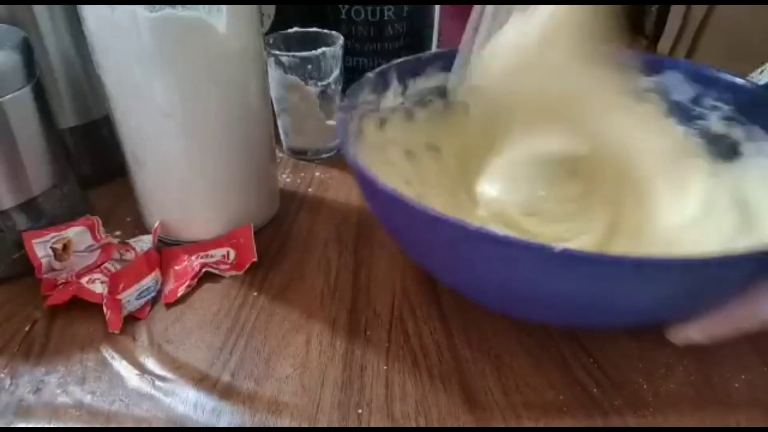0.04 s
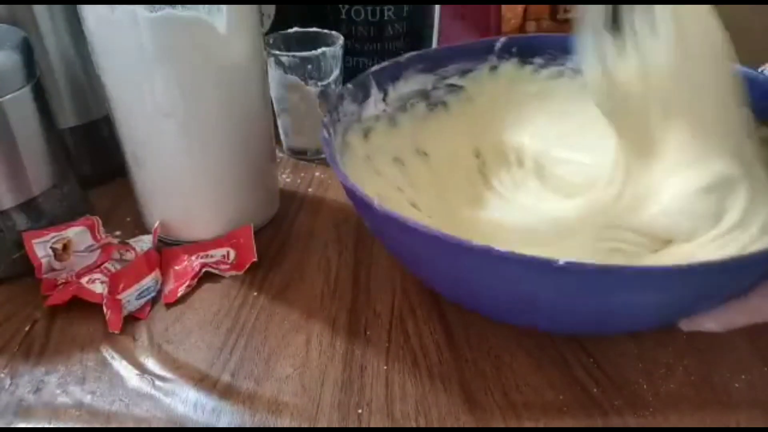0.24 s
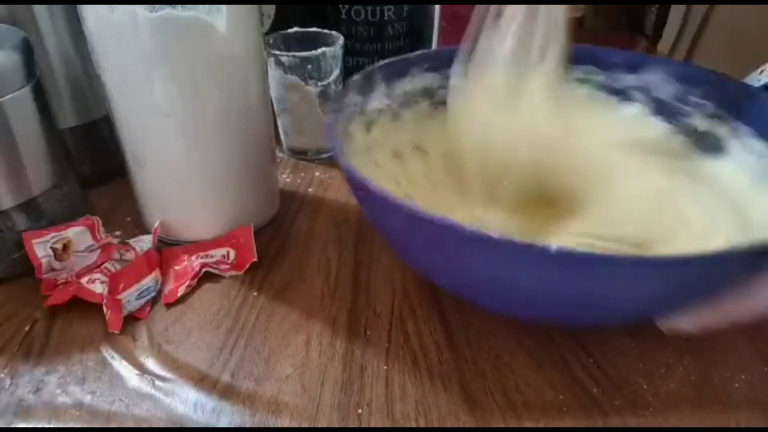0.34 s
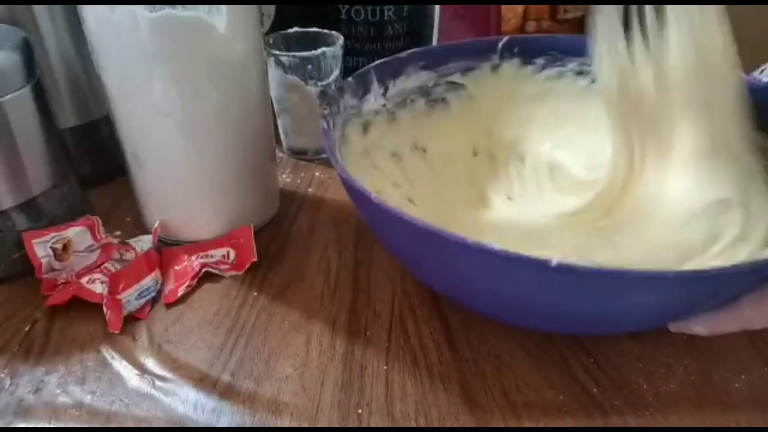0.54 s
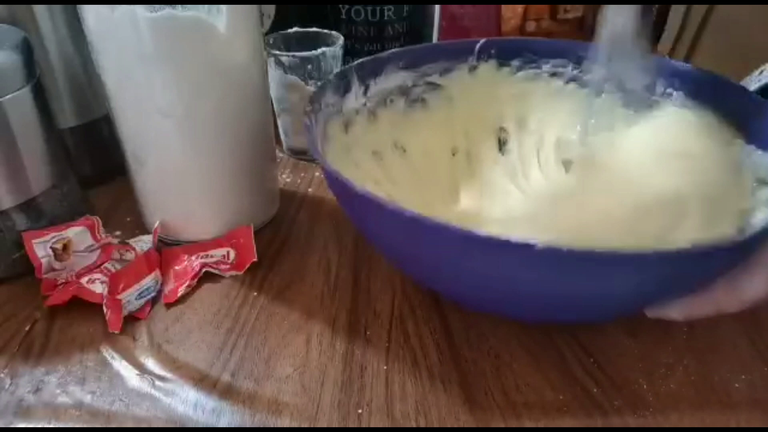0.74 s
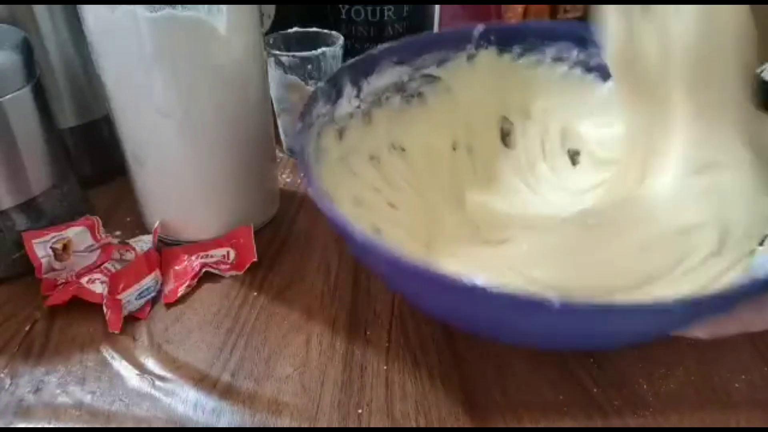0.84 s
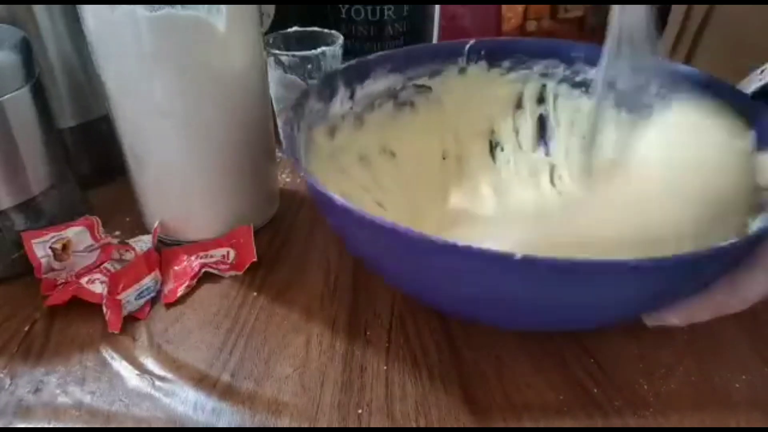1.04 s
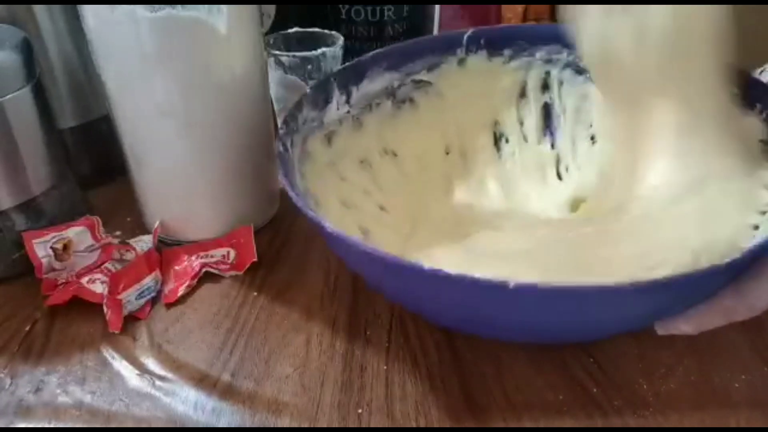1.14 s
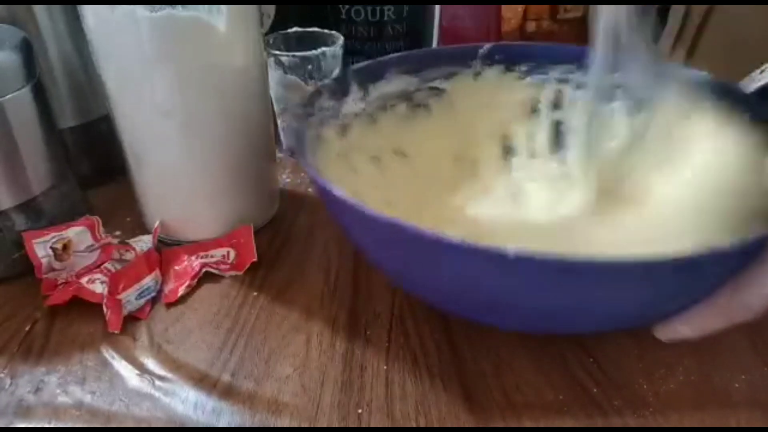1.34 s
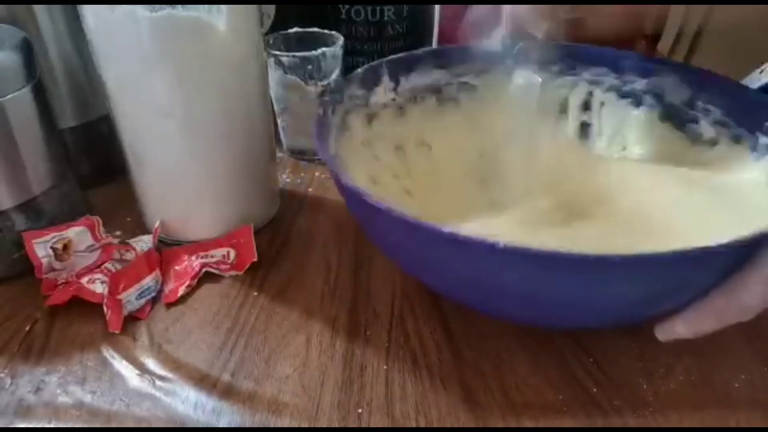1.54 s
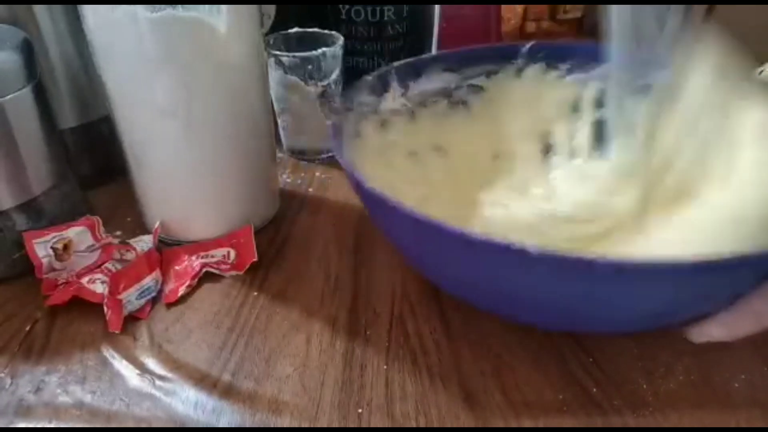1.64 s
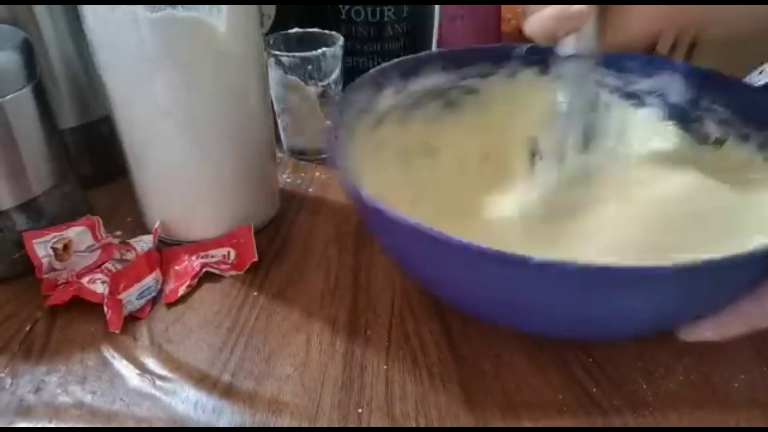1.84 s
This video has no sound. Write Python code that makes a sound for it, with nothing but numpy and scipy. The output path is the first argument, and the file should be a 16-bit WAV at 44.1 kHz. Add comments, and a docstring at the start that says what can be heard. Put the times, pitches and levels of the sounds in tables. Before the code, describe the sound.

A wire whisk beats thick batter in a plastic bowl, about three and a half strokes a second; each stroke gives dull knocks, sharp clacks and a wet squelch, heard close in stereo in a hard-walled kitchen.

```python
"""A hard-walled kitchen: a wire whisk beats thick batter in a hand-held plastic bowl, close to a stereo pair.
About three and a half strokes a second: dull knocks, a quick cluster of clacks, a squelch of batter.
Each contact is a snap plus damped noise, with the bowl's low modes thudding; batter is swarms of tiny pops.
The room is decaying noise convolved with the close sound, over a quiet floor of rumble and hiss."""
import sys
import numpy as np
from scipy import signal
from scipy.fft import rfft, irfft
from scipy.io import wavfile
from scipy.ndimage import uniform_filter1d

SR = 44100
rng = np.random.default_rng(int(sys.argv[2]) if len(sys.argv) > 2 else 0)


def persist_wave(psi):
    """Save psi, clipped to +-1, as 16-bit WAV."""
    counts = np.round(np.clip(psi, -1, 1) * 32767).astype(np.int16)
    wavfile.write(sys.argv[1], SR, np.atleast_2d(counts).T)


N = 83790
LEAD = SR // 5  # samples of run-up, so that the room already rings at the start
SIZE = N + LEAD
T = np.arange(SR // 5) / SR  # time within one short sound, s


def amp(db):
    """Decibels to gain."""
    return 10 ** (np.asarray(db) / 20)


def along(points, hz):
    """(Hz, value) points interpolated on a log frequency axis."""
    f, v = np.transpose(points)
    return np.interp(np.log(hz + 1), np.log(f + 1), v)


def freqs(x):
    """The frequencies of a signal's spectrum, in Hz."""
    return np.fft.rfftfreq(x.shape[-1], 1 / SR)


def tilt(hz, db_per_octave):
    """Brightness: a slope in dB that reaches its full steepness well above 500 Hz."""
    return db_per_octave * np.log2(1 + hz / 500)


def burst(x):
    """Fade out a short sound and scale it to the energy of 10 ms at rms 1."""
    x = x * np.clip(2 - T / T[-1] / .45, 0, 1)
    energy = np.mean(np.sum(x ** 2, axis=-1))
    return x / np.sqrt(energy / (SR / 100) + 1e-20)


def add(track, s, sound):
    """Mix a sound in at time s."""
    i = max(0, round(s * SR) + LEAD)
    track[:, i:i + sound.shape[-1]] += sound[..., :SIZE - i]


def coloured(x, shape_db):
    """Causal minimum-phase filter with a given level at each frequency."""
    n = x.shape[-1]
    cepstrum = irfft(np.log(amp(shape_db)), n)
    # folding the cepstrum forward in time makes the filter causal
    cepstrum[1:n // 2] *= 2
    cepstrum[n // 2 + 1:] = 0
    return irfft(rfft(x) * np.exp(rfft(cepstrum)), n)


def spread(pair, alike):
    """Two unrelated signals become left and right with a given likeness (correlation)."""
    turn = np.arccos(np.clip(along(alike, freqs(pair)), -1, 1)) / 2
    mid, side = irfft(rfft(pair) * [np.cos(turn), np.sin(turn)], pair.shape[-1])
    return np.array([mid + side, mid - side])


# how alike the close sound is at the two microphones: (f/Hz, left-right likeness 0..1)
CLOSE_ALIKE = [(100, 0.77), (300, 0.87), (700, 0.62), (1700, 0.2), (4000, 0.31), (12000, 0.018)]
SNAP_DB, SNAP_DELAY_S, SNAP_HZ = -4.5, 0.000499, 4640  # level beside the ring, delay, low-pass corner
BITE_HZ, BITE_OCTAVES = 2800, 0.47  # centre and width of the upper-mid bite


def contact(t60, colour, tilt_db, bite_db=0):
    """One sharp snap, then the dense, quickly damped ringing of the plastic."""
    hz = freqs(T)
    noise = rfft(rng.standard_normal((2, len(T))) * amp(-60 * T / t60))
    # even out the noise spectrum, so that the colour table alone sets the tone
    power = uniform_filter1d(np.abs(noise) ** 2, size=160, axis=1)
    ring = noise / np.sqrt(np.abs(power) + 1e-12)
    delay = np.exp(-2j * np.pi * hz * SNAP_DELAY_S)
    snap = amp(SNAP_DB) * delay / (1 + 1j * hz / SNAP_HZ)
    hit = spread(irfft(ring, len(T)), CLOSE_ALIKE) + irfft(snap, len(T))
    bite = np.exp(-(np.log2((hz + 1) / BITE_HZ) / BITE_OCTAVES) ** 2 / 2)
    shape_db = along(colour, hz) + tilt(hz, tilt_db) + bite_db * bite
    return burst(coloured(hit, shape_db))


# modes of the loaded bowl before scatter and detuning: (f/Hz, relative level/dB, t60/s)
BOWL_MODES = [(96.2, -11.5, 0.11), (131.3, -4.5, 0.12), (162, -8.5, 0.075), (202.8, -3, 0.11),
              (230.6, -2, 0.055), (273.4, 2, 0.049), (316, 1, 0.042), (360, 0.5, 0.028), (615, -6.5, 0.075),
              (624, -15, 0.11), (766, -13, 0.024), (863, -5, 0.023), (1013, -18.5, 0.027)]
LOAD_DETUNE, MODE_SCATTER_DB = .03, 2  # standard deviations: fraction of frequency, level
BOWL_ATTACK_S, FOCUS_OCTAVES = 0.0014, 0.77


def bowl(centre_hz):
    """The damped low modes of the bowl, detuned by shifting batter; where the whisk lands decides which lead."""
    hz, db, t60 = np.transpose(BOWL_MODES)[:, :, None]
    size, detune = rng.standard_normal((2, len(BOWL_MODES), 1))
    sign = (-1) ** np.arange(len(BOWL_MODES))[:, None]
    envelope = sign * amp(db + MODE_SCATTER_DB * size - 60 * T / t60)
    modes = envelope * np.sin(2 * np.pi * hz * (1 + LOAD_DETUNE * detune) * T)
    focus = np.exp(-(np.log2(hz / centre_hz) / FOCUS_OCTAVES) ** 2 / 2)
    attack = 1 - np.exp(-T / BOWL_ATTACK_S)
    return burst((focus * modes).sum(0) * attack)


# wires hit the bowl wall:
# (t/s, clack level/dB, brightness/dB per octave, upper-mid bite/dB, thud level/dB, thud centre f/Hz)
WALL_CLACKS = [(-.07, -12.5, -1.2, 1.5, -44, 500), (.2080, -30.5, 2.5, -7, -41, 303),
               (.2170, -30, -4, -8, -26, 510), (0.2233, -28, 4.5, -1.5, -38, 202),
               (0.2287, -25.5, -1.5, -11, -25, 143), (.2590, -40.5, 8.5, -6, -39, 160),
               (0.4967, -24.5, 3, -9, -60, 251), (.5000, -20.5, -2, 0, -24, 244),
               (.5030, -30, 3, -33, -26, 259), (0.5056, -26, -0.5, -7.5, -23, 200),
               (0.5808, -43, 7.5, -22, -48, 202), (0.7918, -28, -1, -3, -33.5, 277),
               (.7940, -23, -3, -4, -19, 266), (0.8011, -25.5, 0.5, -2.5, -25, 235),
               (0.8157, -33, -7.5, 4, -32, 266), (1.0793, -20.5, -4, -4, -34, 650),
               (1.085, -33, 1, -15, -29, 644), (1.0922, -29.5, 4, 14, -22.5, 290),
               (1.0986, -26.5, 0, 0.5, -32.5, 295), (1.3745, -25.5, -3, -0.5, -31.5, 497),
               (1.3791, -17, 0.5, -4, -23, 326), (1.3825, -23, 5.5, 5, -25, 285),
               (1.6662, -36.5, 4.5, -5, -67, 397), (1.6726, -28, 5, 0.5, -33.5, 400),
               (1.674, -21.5, 0.4, 4.5, -36.5, 330), (1.6827, -31.5, 4.5, -29, -53.5, 400)]
# the whisk knocks the bowl through a cushion of batter:
# (t/s, knock level/dB, brightness/dB per octave, thud level/dB, thud centre f/Hz)
CUSHIONED_KNOCKS = [(0.1152, -43, -2, -35, 190), (0.159, -46, -1, -37.5, 220),
                    (0.25, -30, -5.5, -38.5, 180), (0.327, -49, -3, -36.5, 134),
                    (0.4519, -31, -3, -28, 166), (0.467, -37, -1.5, -33, 200),
                    (0.484, -29.5, -3, -38.5, 245), (0.7311, -30.5, -4, -32.5, 950),
                    (0.7442, -34, -3, -38, 216), (0.7664, -37.5, -3, -37, 398),
                    (.8205, -30.5, 2.5, -29, 270), (1.0645, -26.5, 2, -25, 252),
                    (1.0810, -26.5, 4, -31, 640), (1.1404, -34.5, 1.5, -36.5, 248),
                    (1.3382, -34, 2, -30, 150), (1.3467, -28.5, 2, -29, 200), (1.6106, -34, -1, -36, 280),
                    (1.6422, -39, -8, -42, 260), (1.724, -64, 14, -51, 300), (1.881, -38, -4.5, -33, 198),
                    (1.8900, -40, 3, -27, 163)]
# spectrum of a clack before brightness and bite: (f/Hz, relative level/dB)
CLACK_SPECTRUM = [(40, -29), (120, -18.5), (260, 2.5), (500, 3.5), (900, 1.5), (1400, 4.5), (2300, 2.5),
                  (4000, -1.5), (6300, -9), (8000, -18), (9500, -21), (10500, -33), (12300, -30),
                  (13300, -21), (15300, -28.5), (16500, -50)]
# spectrum of a knock before brightness: (f/Hz, relative level/dB)
KNOCK_SPECTRUM = [(30, -25), (100, 5.5), (300, -1), (500, -6), (850, 1), (1400, -12.5), (2500, -18),
                  (5000, -35), (9000, -47), (14000, -64)]
CLACK_T60_S, KNOCK_T60_S = 0.023, 0.038


def whisk():
    """Hard clacks and cushioned knocks; both set the bowl thudding."""
    out = np.zeros((2, SIZE))
    for s, db, tilt_db, bite_db, thud_db, thud_hz in WALL_CLACKS:
        clack = amp(db) * contact(CLACK_T60_S, CLACK_SPECTRUM, tilt_db, bite_db)
        add(out, s, clack + amp(thud_db) * bowl(thud_hz))
    for s, db, tilt_db, thud_db, thud_hz in CUSHIONED_KNOCKS:
        knock = amp(db) * contact(KNOCK_T60_S, KNOCK_SPECTRUM, tilt_db)
        add(out, s, knock + amp(thud_db) * bowl(thud_hz))
    return out


POPS_PER_S, POP_SPREAD_DB = 2500, 4  # mean rate per channel, standard deviation of pop level


def swarm(swell, colour, tilt_db=0):
    """Many tiny pops of uneven size, at random instants under one swell."""
    shape = (2, len(T))
    sizes = np.sign(rng.standard_normal(shape)) * amp(POP_SPREAD_DB * rng.standard_normal(shape))
    pops = (rng.random(shape) < POPS_PER_S / SR) * sizes * swell
    hz = freqs(T)
    shape_db = along(colour, hz) + tilt(hz, tilt_db)
    return burst(spread(coloured(pops, shape_db), CLOSE_ALIKE))


# batter tears from the wires: (t/s at its height, level/dB, rise/s, brightness/dB per octave)
BATTER_SQUELCHES = [(.015, -54, 0.053, -4), (.06, -52, 0.036, -3), (0.229, -27, 0.018, 0.5),
                    (.385, -61, 0.029, 17), (0.507, -29, 0.018, 0.5), (0.795, -27, 0.018, 1.5),
                    (1.101, -30.5, .02, 1.5), (1.388, -28.5, .014, -1), (1.675, -37, 0.011, 0.5)]
# spectrum of a squelch before brightness: (f/Hz, relative level/dB)
SQUELCH_SPECTRUM = [(50, -42), (200, -10), (600, -12), (2000, 10.5), (5000, -1), (8000, -5.5),
                    (9500, -13.5), (11000, -18), (12300, -14), (13500, -11), (15300, -15), (16500, -33)]
# the whisk drags through the thick mass: (start t/s, length/s, level/dB)
WHISK_DRAGS = [(0.059, 0.11, -38.5), (0.281, 0.055, -44), (0.458, 0.067, -35.5), (.732, 0.1, -42.5),
               (1.115, 0.11, -43.5), (1.343, 0.056, -35.5), (1.613, .06, -43.5)]
# spectrum of a drag: (f/Hz, relative level/dB)
DRAG_SPECTRUM = [(40, -17), (110, 0.5), (280, -5.5), (450, -11), (800, -1.5), (1400, -10), (3000, -17.5),
                 (6000, -32), (14000, -42)]
SQUELCH_FALL_S = 0.014  # time constant


def batter():
    """A low churning while the wires drag, and a wet crackle of air pockets as they tear free."""
    out = np.zeros((2, SIZE))
    for s, db, rise, tilt_db in BATTER_SQUELCHES:
        fall = np.exp(-np.maximum(T - rise, 0) / SQUELCH_FALL_S)
        swell = np.minimum(T / rise, 1) ** 2 * fall
        add(out, s - rise, amp(db) * swarm(swell, SQUELCH_SPECTRUM, tilt_db))
    for s, length, db in WHISK_DRAGS:
        arch = np.sqrt(np.clip(T / length * (1 - T / length), 0, 1))
        add(out, s, amp(db) * swarm(arch, DRAG_SPECTRUM))
    return out


# how alike the room is at the two microphones: (f/Hz, left-right likeness 0..1)
ROOM_LIKENESS = [(100, 1), (280, .93), (600, 0.81), (1100, 0), (4000, 0)]
# how long the kitchen rings: (f/Hz, t60/s)
ROOM_RING = [(100, 0.74), (260, 0.39), (700, 0.45), (1840, 0.55), (4850, 0.44), (9000, 0.39), (14000, 0.32)]
# how loud the kitchen rings: (f/Hz, level/dB against the direct sound)
ROOM_LEVEL = [(50, -9), (130, -2), (260, -15.5), (600, -4.5), (1500, -10.5), (4000, -8), (8000, -6),
              (14000, -7.5)]
ROOM_BUILD_S = 0.0053  # time constant


def room_tail():
    """One diffuse answer of the room; each frequency dies at its own speed."""
    hz, t, noise = signal.stft(rng.standard_normal((2, SR * 2 // 3)), SR, nperseg=256)
    decay = amp(-60 * t / along(ROOM_RING, hz)[:, None]) * (1 - np.exp(-t / ROOM_BUILD_S))
    # equal energy at every frequency before the level table
    decay /= np.sqrt(np.sum(decay ** 2, axis=1, keepdims=True) * t[1] * SR)
    level = amp(along(ROOM_LEVEL, hz))[:, None]
    tail = signal.istft(noise * decay * level, SR, nperseg=256)[1]
    return spread(tail, ROOM_LIKENESS)


STROKE_S = .29  # a fresh room answer is drawn this often


def kitchen(x):
    """The bowl moves in the hand, so the room answers each stroke-long stretch a little differently."""
    out = np.zeros((2, SIZE))
    step = round(STROKE_S * SR)
    for i in range(0, SIZE, step):
        answer = signal.fftconvolve(x[:, i:i + step], room_tail(), axes=1)
        add(out, (i - LEAD) / SR, answer)
    return out


# spectrum of the quiet room: (f/Hz, relative level/dB)
FLOOR_SPECTRUM = [(20, -1), (60, 12), (130, 10), (300, 3), (1000, -4), (4000, -25), (9000, -23),
                  (16000, -66)]
FLOOR_DB = -62  # rms level


def floor():
    """The quiet rumble and hiss of the room, as steady filtered noise."""
    x = rng.standard_normal((2, N))
    x = spread(coloured(x, along(FLOOR_SPECTRUM, freqs(x))), ROOM_LIKENESS)
    return amp(FLOOR_DB) * x / x.std()


def scene():
    """Whisk and batter close by, the kitchen ringing around them, the room's floor beneath."""
    near = whisk() + batter()
    return (near + kitchen(near))[:, LEAD:] + floor()


# colour difference of the two microphones: (f/Hz, left minus right level/dB)
MIC_BALANCE = [(60, -1), (250, -1.5), (600, -3), (1200, 0), (2500, -0.5), (5000, 2), (8000, 3), (11000, 7),
               (14000, 9.5)]
TOP_HZ = 16500  # band limit


def record(dry):
    """The two microphones differ in colour; nothing is kept above the band limit."""
    x = np.pad(dry, ((0, 0), (0, LEAD)))
    hz = freqs(x)
    lean_db = along(MIC_BALANCE, hz) / 2  # half the difference to each side
    response = amp([lean_db, -lean_db]) * (hz < TOP_HZ)
    return irfft(rfft(x) * response, x.shape[-1])[:, :N]


dry = scene()
out = record(dry)
persist_wave(out)
```